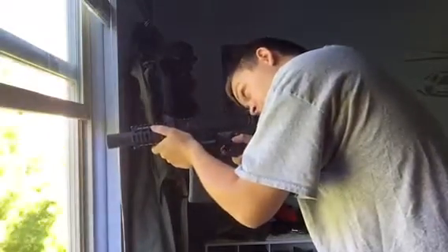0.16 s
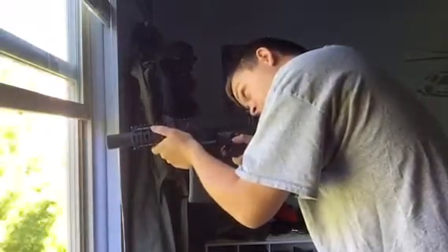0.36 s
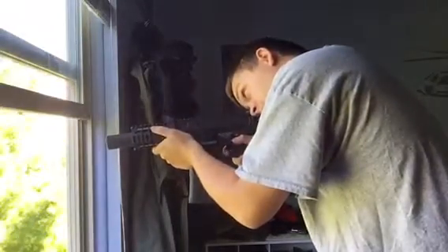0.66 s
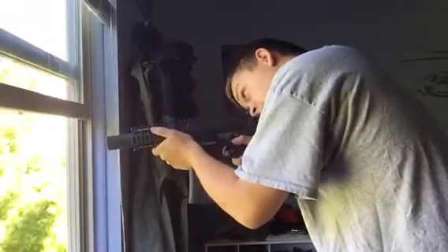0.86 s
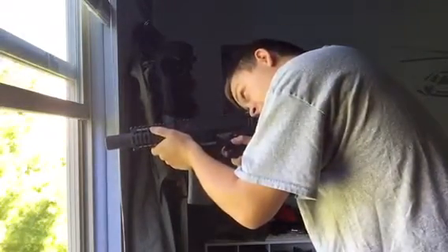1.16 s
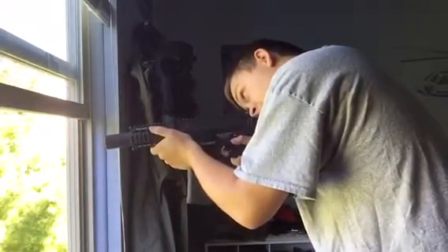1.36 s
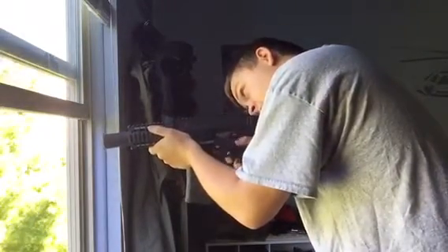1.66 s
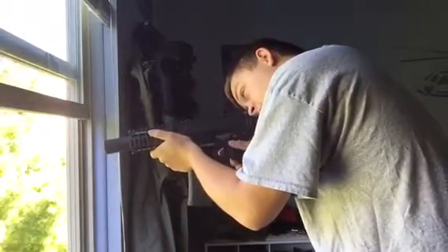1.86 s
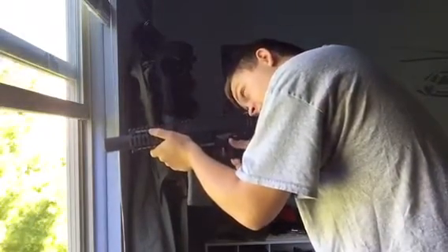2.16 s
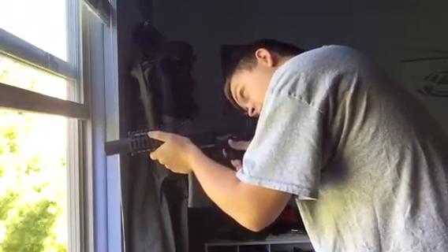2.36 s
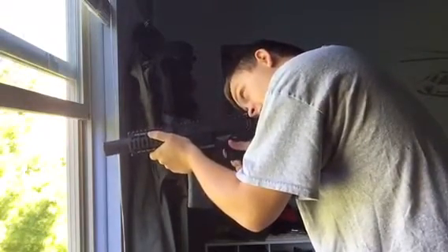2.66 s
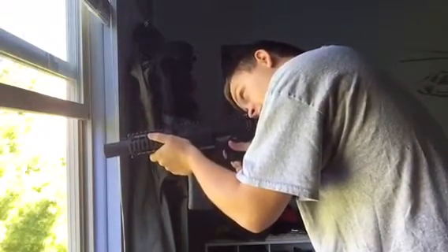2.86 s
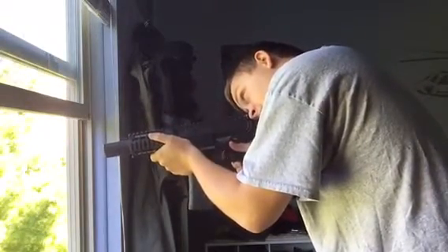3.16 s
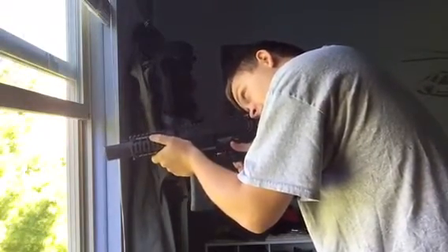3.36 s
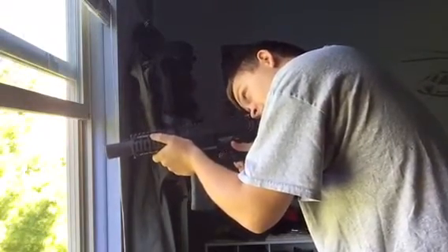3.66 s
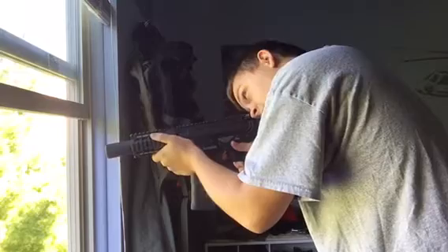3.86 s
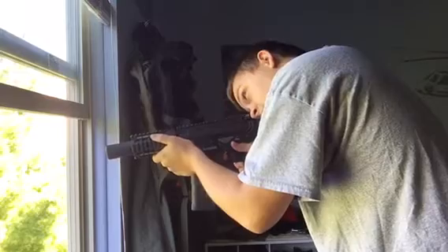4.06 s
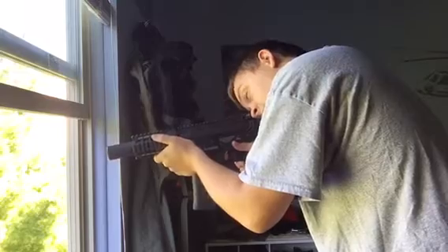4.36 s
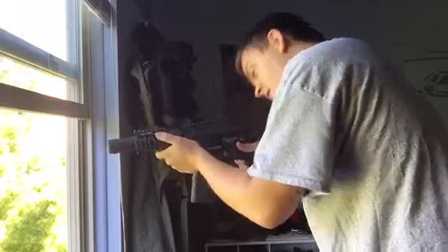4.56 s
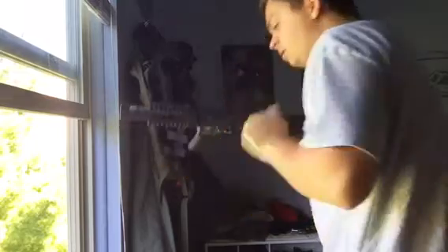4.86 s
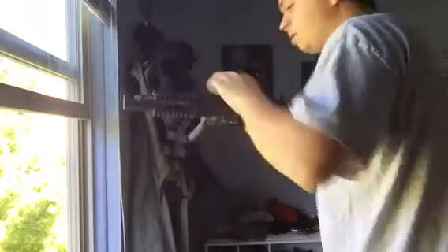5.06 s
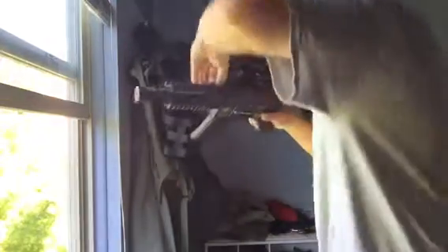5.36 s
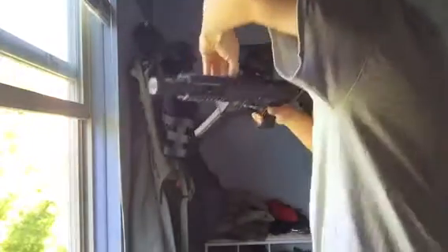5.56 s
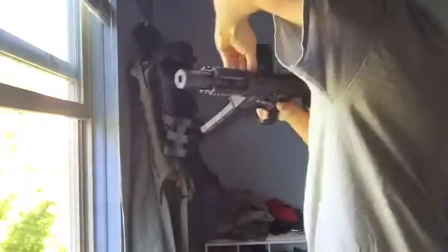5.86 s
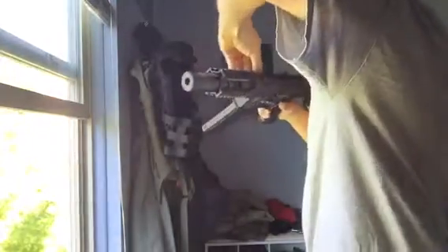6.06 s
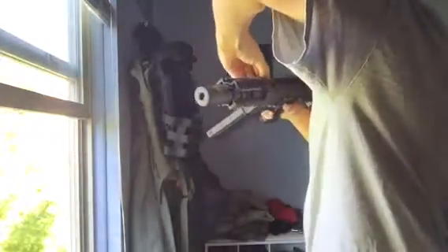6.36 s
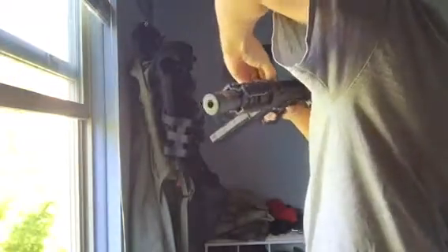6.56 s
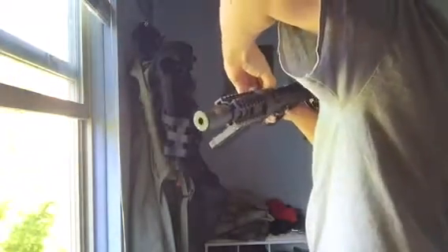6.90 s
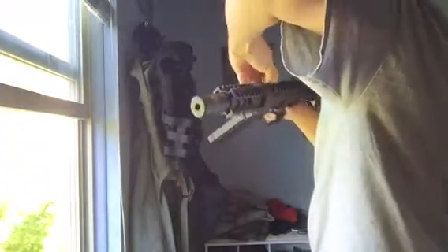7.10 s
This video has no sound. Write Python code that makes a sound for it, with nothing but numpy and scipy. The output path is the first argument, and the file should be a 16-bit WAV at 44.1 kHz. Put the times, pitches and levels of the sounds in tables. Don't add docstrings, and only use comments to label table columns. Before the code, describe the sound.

A close microphone in a small bedroom with an open window catches an electric airsoft rifle. The tail of an earlier shot opens the scene; a short gear whirr and hard, hollow piston clack come at 0.12 seconds, then five more at 0.79, 0.99, 1.17, 1.33 and 1.50. Each has a tiny tick, low thump and bright rattling slam with short wall echoes. A crisp selector snap sounds at 1.85, a very faint rattle at 2.3. From 2.41 the motor growls up, and a burst of about thirty strokes per second runs from 2.47 to 3.3 with grinding, whining gears, then coasts down quickly. A pellet ticks to rest around 3.92-4.02. Faint scrapes follow from 4.3 to 5.35, a clearer rail knock at 5.73, and light knocks until 6.9. Low wavering hum and soft outdoor hiss persist throughout.

```python
import sys
import numpy as np
from scipy import signal
from scipy.io import wavfile
from scipy.ndimage import uniform_filter1d

SR = 44100
rng = np.random.default_rng(int(sys.argv[2]) if len(sys.argv) > 2 else 0)


def volts(x):
    e = np.asarray(x, float) / 20
    return 10 ** e


def dump_mix(stems):
    frames = np.atleast_2d(stems).T
    limited = np.clip(frames, -1, 1)
    pcm = np.round(limited * 32767).astype(np.int16)
    wavfile.write(sys.argv[1], SR, pcm)


N = 318962
LEAD = SR // 4

# time in seconds, strength in dB.
SINGLE_STROKES = [(-0.075, -15), (0.1239, -9), (0.7863, -8.5), (0.9934, -8.5), (1.1672, -7.5), (1.3252, -8),
                  (1.4972, -9.5)]
# time in seconds, strength in dB.
BURST_STROKES = [(2.4652, -8), (2.512, -8), (2.5527, -10), (2.5877, -14), (2.6215, -10.5), (2.6536, -11),
                 (2.6865, -17), (2.7203, -12.5), (2.753, -16), (2.7878, -13), (2.8208, -11), (2.853, -13),
                 (2.8865, -19), (2.919, -11.5), (2.953, -14.5), (2.9855, -12), (3.0183, -19),
                 (3.052, -13.5), (3.085, -13.5), (3.1195, -17.5), (3.151, -13.5), (3.184, -14),
                 (3.2173, -14), (3.251, -11.5), (3.3012, -13)]
# frequency in Hz, level in dB per Hz.
CLACK_SPECTRUM = [(240, -21), (400, 2), (1430, -6), (2150, -2), (3370, -11.5), (4530, -7), (6190, -8.5),
                  (7700, -21), (14800, -32.5), (15700, -30.5), (16500, -59)]
# frequency in Hz, level in dB, t60 in seconds.
BODY_MODES = [(124, -10, 0.011), (179.6, -11, 0.17), (265.5, 0, 0.12), (277.2, -14, 0.35), (388, -9.5, .11),
              (639, -3.5, 0.066), (970, -11, 0.03), (1228, -13, 0.14), (1514, -8, .05), (1870, -12, 0.24),
              (2300, -11.5, .04), (3076, -7.5, .03), (4390, -9.5, 0.052), (5440, -11.5, 0.062)]
# start in seconds, stop in seconds, grind in dB, tooth rate reached if held in Hz.
TRIGGER_PULLS = [
    (-.15, -0.082, -27, 2300),
    (0.075, 0.135, -19, 2287),
    (0.7306, 0.8, -18.5, 2290),
    (0.948, 1.022, -21.5, 2360),
    (1.117, 1.199, -22, 2316),
    (1.28, 1.358, -23.5, 2301),
    (1.443, 1.519, -22.5, 2220),
    (2.411, 3.226, -19.5, 2850),
]
# frequency in Hz, level in dB per Hz.
GRIND_SPECTRUM = [(180, -65.5), (560, -15.5), (1110, -6.5), (1330, -5), (2280, -12), (2790, -4.5),
                  (3900, -10), (4930, -12.5), (6140, -12.5), (7890, -18), (15400, -29.5), (16500, -52.5)]
# frequency in Hz, width in Hz, level in dB.
SHELL_RESONANCES = [(1190, 40, 3.5), (3740, 230, -4), (4100, 250, 2), (5884, 360, 10), (7047, 110, 2)]
# time in seconds, peak in dB, scrape after the snap in dB.
SELECTOR_CLICKS = [
    (1.8428, -32.5, 6),
    (1.8542, -3.5, -15),
]
# frequency in Hz, level in dB per Hz.
SNAP_SPECTRUM = [(410, -54.5), (700, -25), (1790, -12), (2270, -14), (2920, -1.5), (4280, -5.5), (5880, -1),
                 (7460, -9), (8080, -10), (14100, -20.5), (16500, -32.5)]
# frequency in Hz, level in dB, t60 in seconds.
LEVER_MODES = [(1160, -27, 0.015), (2774, -14, 0.018), (3150, -15.5, 0.0079), (5880, -10, 0.02),
               (7330, -10.5, 0.013)]
# time in seconds, peak in dB, centre in Hz, scrape in dB.
LOOSE_RATTLES = [
    (2.285, -55, 4100, -18),
    (4.295, -61, 4600, -14),
    (4.646, -56, 4000, -4),
    (4.719, -54, 4500, -8),
    (4.858, -46.5, 2400, 10),
    (5.345, -52, 4700, 3),
]
# time in seconds, peak in dB, centre in Hz, ring in dB.
RAIL_KNOCKS = [
    (5.313, -48, 2900, -8),
    (5.357, -51.5, 1600, -10),
    (5.727, -31.5, 3770, -17),
    (5.733, -39, 4000, -22),
    (5.958, -68, 2900, -4),
    (6.181, -54, 1700, -7.5),
    (6.614, -63, 3000, -5),
    (6.629, -59.5, 1706, -8),
    (6.9, -46.5, 2970, -10.5),
]
# frequency in Hz, level in dB, t60 in seconds.
RAIL_MODES = [(1293, 1, 0.04), (2850, 2.5, 0.052), (3906, -1.5, .025), (4235, -7, 0.035)]
# delay in seconds, level in dB.
WALL_ECHOES = [(.006, -18), (0.01, -16.5), (0.013, -21.5), (.0205, -14.5), (0.0224, -18.5), (0.026, -18.5)]
# frequency in Hz, t60 in seconds.
ROOM_T60 = [(100, 0.35), (260, .26), (700, 0.47), (1100, 0.32), (1600, .48), (2400, 0.26), (4850, 0.31),
            (12800, 0.25)]
# frequency in Hz, level in dB.
WALL_RETURN = [(100, -12), (300, -13.5), (750, -12.5), (1500, -4.5), (5000, -5.5), (14000, -11)]
# frequency in Hz, level in dB per Hz.
HISS_SPECTRUM = [(44, -29.5), (75, 2), (141, -15.5), (377, -16), (740, -22.5), (968, -21.5), (1060, -20.5),
                 (4980, -36.5), (6820, -40), (7800, -32.5), (10400, -49), (15000, -48.5), (16000, -51)]
# time in seconds, level in dB.
HUM_LEVEL = [(0.0, -69), (0.28, -56), (0.66, -57), (1.07, -71), (1.43, -59), (1.63, -66), (2.01, -53.5),
             (2.2, -59), (2.48, -53), (3.4, -64), (4.33, -55), (4.75, -69), (5.3, -60.5), (5.78, -55),
             (6.05, -59), (6.36, -53.5), (6.8, -62), (7.23, -59)]


def evened(x):
    return x / np.sqrt(np.mean(x ** 2) + 1e-20)


def smooth_noise(n, size):
    return evened(uniform_filter1d(rng.standard_normal(n), size=size))


def read(points, hz):
    f, value = np.transpose(points)
    return np.interp(np.log(hz + 1), np.log(f + 1), value)


def add(mix, s, sound):
    part = mix[LEAD + round(s * SR):][:len(sound)]
    part += sound[:len(part)]


def colour(x, points):
    gain_db = np.maximum(read(points, abs(np.fft.fftfreq(4096, 1 / SR))), -90)
    log_gain = np.log(volts(gain_db))
    taps = np.fft.ifft(np.exp(log_gain - 1j * signal.hilbert(log_gain).imag)).real[:2048]
    return signal.oaconvolve(x, taps / np.linalg.norm(taps))[:len(x)]


def resonate(x, hz, width_hz):
    turn = np.exp(2j * np.pi * np.cumsum(hz * np.ones(len(x))) / SR)
    r = np.exp(-np.pi * width_hz / SR)
    return 2 * (turn * signal.lfilter([1 - r], [1, -r], x / turn)).real


def rings(modes, t):
    hz, db, t60 = np.transpose(modes)[:, :, None]
    return (volts(db - 60 * t / t60) * np.sin(2 * np.pi * hz * t)).sum(0)


def surge(t, scale_s, fall_s):
    return t / scale_s * np.exp(1 - t / fall_s)


def thump(t):
    low_modes = [m for m in BODY_MODES if m[0] < 500]
    out = np.zeros(len(t))
    for delay_s, db in ((.0022, 1.5), (.027, -8)):
        s = np.maximum(t - delay_s, 0)
        puff = np.sin(2 * np.pi * (165 * s + 9500 * s ** 2)) * surge(s, 0.0026, 0.0037)
        out += volts(db) * (volts(-0.5) * puff + rings(low_modes, s) * (1 - np.exp(-s / 0.009)))
    return out


def piston(tick_db, thump_db, clack_db, rebound_db, blow, chance):
    t = np.arange(len(blow)) / SR
    u = (t - .0003) * 2 * np.pi * 2400
    tick = -(1 - u ** 2) * np.exp(-u ** 2 / 2)
    slam = surge(np.maximum(t - .001, 0), 0.0046, 0.0035)
    rebound = surge(np.maximum(t - .0175, 0), 0.005, 0.0036)
    rattle = (slam + volts(rebound_db) * rebound) * (.5 * blow + 0.69 * chance)
    high_modes = [m for m in BODY_MODES if m[0] >= 500]
    ring = signal.oaconvolve(rattle, rings(high_modes, t[:3000]))[:len(t)]
    clack = colour(rattle, CLACK_SPECTRUM) + volts(-29.5) * ring
    return volts(tick_db - 3.0) * tick + volts(thump_db + 2.0) * thump(t) + volts(clack_db + 0.5) * clack


def strokes(mix):
    rows = [(s, db + 4.2, db - 9.5, db - .7, -1.5) for s, db in SINGLE_STROKES]
    rows += [(s, db + 12, db - 10, db + 1.7, -15.5) for s, db in BURST_STROKES]
    blow = rng.standard_normal(6000)
    for s, *levels_db in rows:
        add(mix, s, piston(*levels_db, blow, rng.standard_normal(6000)))


def trigger(t, rise_s=.05, coast_s=0.12, loud_rise_s=0.036, loud_fall_s=0.031):
    teeth_hz, drive, strain = np.zeros((3, len(t)))
    for start, stop, db, top_hz in TRIGGER_PULLS:
        held, free = np.clip(t - start, 0, stop - start), np.maximum(t - stop, 0)
        speed_hz = top_hz * (1 - np.exp(-held / rise_s)) * np.exp(-free / coast_s)
        teeth_hz = np.maximum(teeth_hz, speed_hz)
        on = volts(db) * np.exp(-free / loud_fall_s)
        drive += on * (1 - np.exp(-held / loud_rise_s)) ** 0.83 * volts(-3.5 * held)
        strain += on * (1 - np.exp(-held / 0.04)) * np.exp(-(held / 0.075) ** 3)
    drive *= 1 + .6 * sum(np.exp(-abs(t - s) / .012) for s, db in SINGLE_STROKES + BURST_STROKES[:1])
    return teeth_hz, drive, strain


def gear_whine(t, mesh, sway, fall_s=0.031):
    song = np.clip((t - 2.5) / 0.099, 0, 1) * np.exp(-np.maximum(t - TRIGGER_PULLS[-1][1], 0) / fall_s)
    swell_db = 3.5 * np.cos(2 * np.pi * (t - 2.66) / .3)
    turn_level = 1 + 1.1 * np.cos(sway + 0.65)
    whine = song * volts(-30 + swell_db) * turn_level * (mesh[0] + volts(-8.0) * mesh[1])
    return resonate(whine, 2835, 260) + resonate(whine, 5680, 400)


def motor_growl(grit, teeth_hz):
    creep = 1 + .1 * (teeth_hz / 2000 - .4)
    growl = 0
    for hz, width_hz, db in ((1200, 320, -1), (3900, 700, -15)):
        band = resonate(resonate(grit, hz * creep, width_hz), hz * creep, width_hz)
        growl = growl + volts(db) * evened(band)
    return growl


def motor(teeth_db=-18, rough_db=0.0):
    t = (np.arange(N + LEAD) - LEAD) / SR
    teeth_hz, drive, strain = trigger(t)
    turns = np.cumsum(teeth_hz * (1 + 0.004 * smooth_noise(len(t), 300))) / SR
    sway = 2 * np.pi * turns / 47
    mesh = [np.cos(k * (2 * np.pi * turns + 1.3 * np.sin(sway))) for k in (1, 2)]
    grit = rng.standard_normal(len(t)) * volts(rough_db * smooth_noise(len(t), 40))
    grind = colour(evened(grit) + volts(teeth_db) * (mesh[0] + mesh[1]), GRIND_SPECTRUM)
    grind += 0.43 * sum(volts(db) * resonate(grind, hz, width_hz) for hz, width_hz, db in SHELL_RESONANCES)
    grind = evened(grind)
    brushes = signal.lfilter(*signal.butter(N=2, Wn=8000, btype="high", fs=SR), grind)
    brush_level = volts(-25.5) * (teeth_hz / 2850) ** 2
    return brush_level * brushes + drive * grind + strain * motor_growl(grit, teeth_hz) + gear_whine(t, mesh, sway)


def snap(scrape_db, chance, snap_s, scrape_s=0.017, grain_db=7.0):
    t = np.arange(len(chance)) / SR
    grains = volts(grain_db * evened(uniform_filter1d(chance[::-1], size=90)))
    return chance * (surge(t, snap_s, snap_s) + volts(scrape_db) * grains * np.exp(-t / scrape_s))


def selector(peak_db, scrape_db, chance):
    t = np.arange(len(chance)) / SR
    click = colour(snap(scrape_db, chance, snap_s=0.00068, grain_db=3.5), SNAP_SPECTRUM)
    ring = rings(LEVER_MODES, t) * (1 - np.exp(-(t / .0007) ** 2))
    return volts(peak_db) * (1.1 * click / abs(click).max() + ring)


def handling(peak_db, centre_hz, scrape_db, ring_db, spread, chance):
    edges_hz = [centre_hz / spread, centre_hz * spread]
    band = signal.butter(N=2, Wn=edges_hz, btype="band", fs=SR, output="sos")
    knock = signal.sosfilt(band, snap(scrape_db, chance, grain_db=-1.0, snap_s=0.00071, scrape_s=0.028))
    ring = rings(RAIL_MODES, np.arange(len(chance)) / SR)
    return volts(peak_db) * (knock / abs(knock[:200]).max() + volts(ring_db) * ring)


def handling_rows(hop_count=6, hop_s=.0192, hop_loss_db=-3):
    rattles = [(*row, -60, 1.6) for row in LOOSE_RATTLES]
    knocks = [(s, db, hz, -17.5, ring_db, 1.51) for s, db, hz, ring_db in RAIL_KNOCKS]
    hops = [(3.9215 + k * hop_s, -44 + k * hop_loss_db, 4350, -6, -60, 1.22) for k in range(hop_count)]
    return rattles + knocks + hops


def room(x, start_s=0.0074, swell_s=0.0072, late_db=-24, late_t60=0.92):
    out, t = x.copy(), np.arange(len(x)) / SR
    treble = signal.lfilter(*signal.butter(1, 500, "high", fs=SR), x)
    for s, db in WALL_ECHOES:
        delay = round(s * SR)
        out[delay:] += volts(db) * treble[:-delay]
    for k in range(3):
        taps = np.zeros(SR // 2)
        at = np.arange(0, SR // 2 - 20, 20)
        taps[at + rng.integers(0, 20, len(at))] = rng.choice([-1., 1.], len(at))
        hz, s, z = signal.stft(taps, SR, nperseg=256)
        decay = volts(-60 * s / read(ROOM_T60, hz)[:, None]) + volts(late_db - 60 * s / late_t60)
        tail = signal.istft(z * decay * volts(read(WALL_RETURN, hz))[:, None], SR, nperseg=256)[1]
        tail *= 1 - np.exp(-np.maximum(np.arange(len(tail)) / SR - start_s, 0) / swell_s)
        share = np.sqrt(2 / 3) * np.cos(2 * np.pi * (7 * t + k / 3))
        out += volts(-16.0) * signal.oaconvolve(x * share, tail)[:len(x)]
    return out


def outdoor_hiss(patchy_db=1.8):
    frames, hz = N // 512 + 6, np.fft.rfftfreq(2048, 1 / SR)
    a, b, patches = rng.standard_normal((frames, 1025, 3)).T
    patches = evened(uniform_filter1d(uniform_filter1d(patches, size=20, axis=0), size=8, axis=1))
    z = (a + 1j * b) * volts(read(HISS_SPECTRUM, hz)[:, None] + patchy_db * patches)
    return volts(-64) * evened(signal.istft(z, nperseg=2048, noverlap=1536)[1][:N])


def hum():
    t = np.arange(N) / SR
    turns = np.cumsum(55.5 + 1.5 * smooth_noise(N, 6000)) / SR
    tone = np.sin(2 * np.pi * turns) + volts(-25) * np.sin(4 * np.pi * turns)
    out = volts(np.interp(t, *np.transpose(HUM_LEVEL)) + 2.5) * tone
    for hz, width_hz, db in ((162, 5.5, -79.5), (245, 4.8, -80.0), (962, 30, -82.5), (1330, 40, -88.5)):
        out += volts(db) * evened(resonate(rng.standard_normal(N), hz, width_hz))
    return out


def scene():
    rifle = motor()
    strokes(rifle)
    small = np.zeros(len(rifle))
    for rows, part in ((SELECTOR_CLICKS, selector), (handling_rows(), handling)):
        for s, *row in rows:
            add(small, s, part(*row, rng.standard_normal(5000)))
    for share, hz, width_hz in ((.7, 500, 180), (0.87, 325, 38)):
        rifle -= share * resonate(rifle, hz, width_hz)
    rifle = signal.sosfilt(signal.butter(N=2, Wn=55, btype="high", fs=SR, output="sos"), rifle)
    near = 0.35
    heard = room(rifle + (1 - near) * small) + near * small
    return (heard[LEAD:] + outdoor_hiss() + hum())[None]


def roll_off(x):
    return signal.sosfilt(signal.butter(12, 17000, fs=SR, output="sos"), x)


def record(dry):
    held = dry / (1 + abs(dry / .78) ** 4) ** .25
    mix = signal.oaconvolve(held, signal.firwin(255, 15900, fs=SR)[None], "same")
    return roll_off(mix)


dry = scene()
out = record(dry)
dump_mix(out)
```